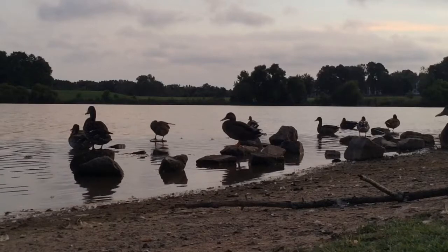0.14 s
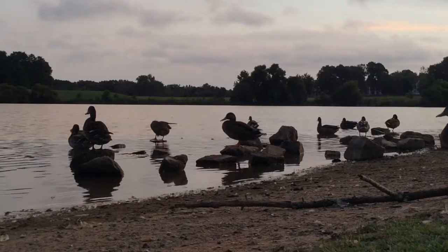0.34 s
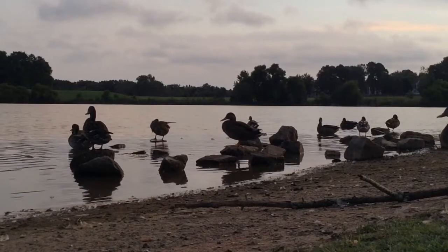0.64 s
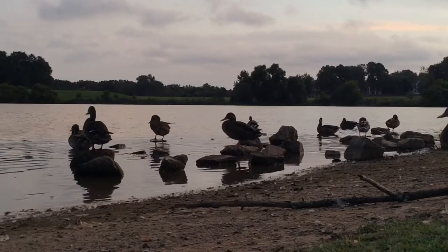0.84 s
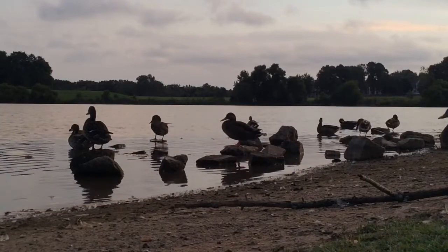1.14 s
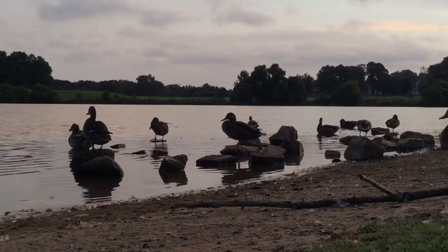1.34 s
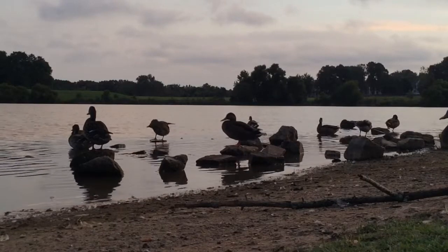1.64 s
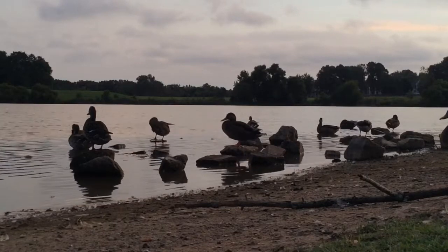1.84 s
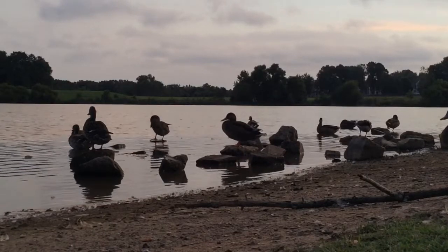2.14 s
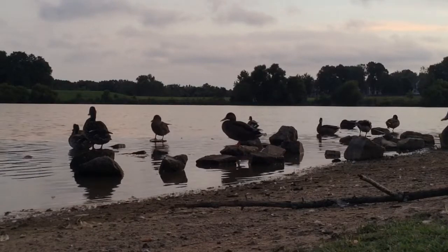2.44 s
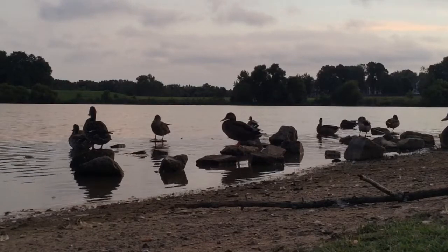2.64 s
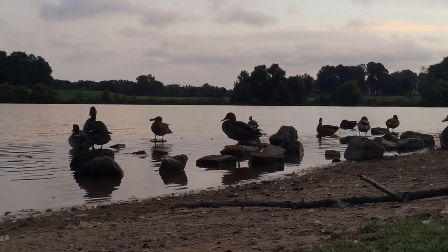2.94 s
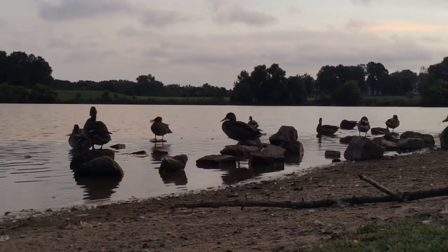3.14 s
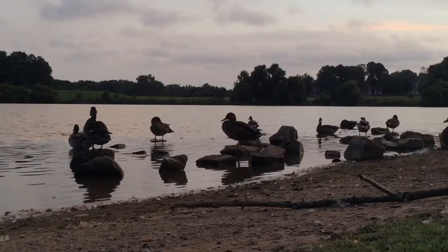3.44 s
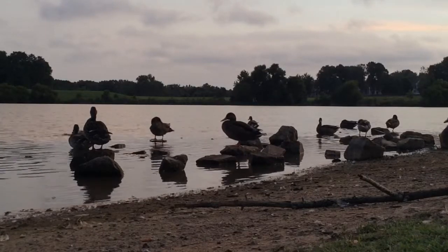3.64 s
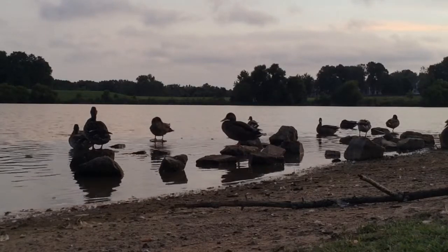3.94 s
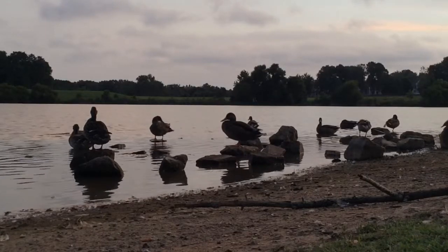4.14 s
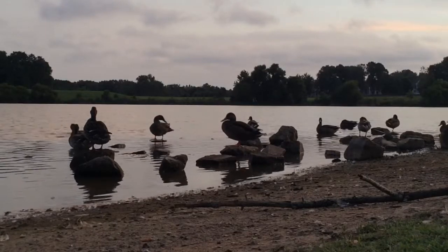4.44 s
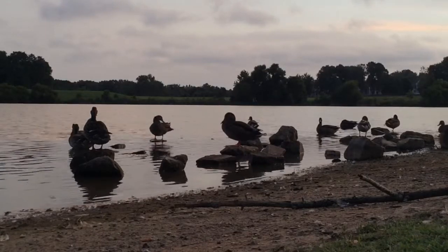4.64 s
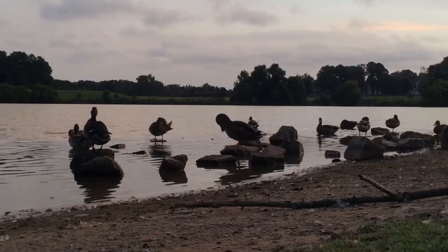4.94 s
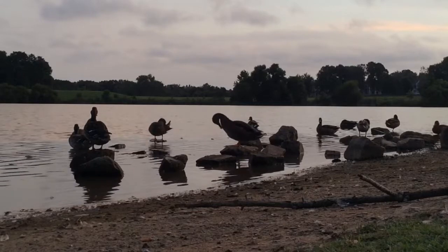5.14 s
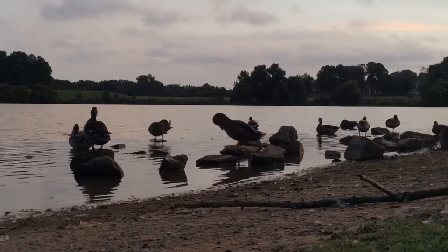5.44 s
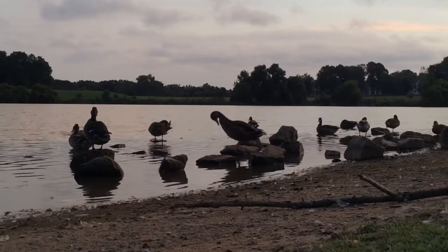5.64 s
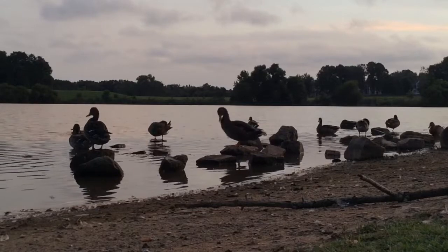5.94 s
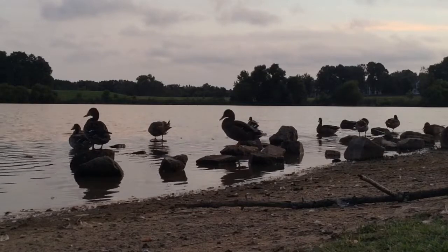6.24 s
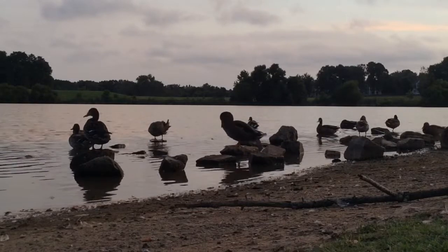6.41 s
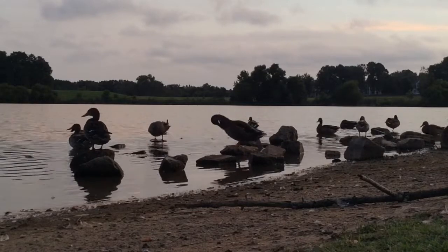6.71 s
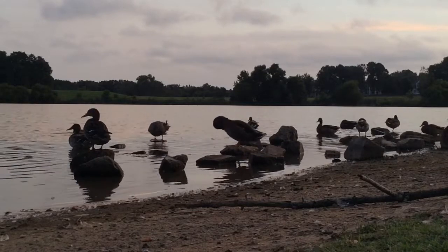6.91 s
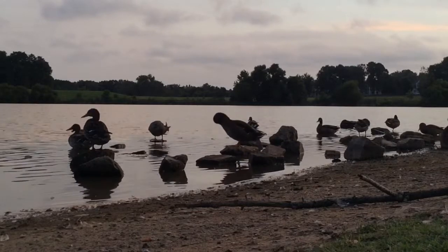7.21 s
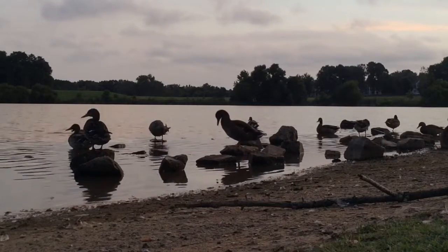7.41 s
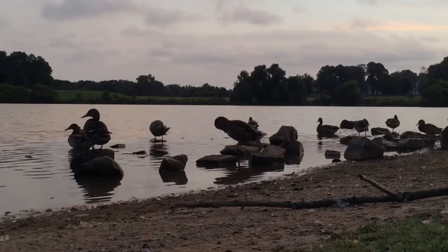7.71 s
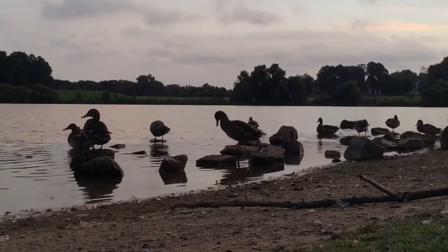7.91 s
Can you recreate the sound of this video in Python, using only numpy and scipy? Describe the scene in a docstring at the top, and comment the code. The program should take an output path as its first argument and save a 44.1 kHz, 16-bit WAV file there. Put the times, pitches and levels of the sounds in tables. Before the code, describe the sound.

A goose honks hoarsely about once a second at a lakeshore, over high insect buzzing and a low rumble of far traffic.

```python
"""A goose honks on a lakeshore: two membranes in its throat oscillate at a low and a high pitch,
alone or together, and their nonlinear coupling breeds sum and difference tones.
A duck quacks once, a pulse train filtered by its bill, and the far shore faintly answers both birds.
Katydids buzz and tick by scraping their wings, and water drips ring as trapped bubbles.
Far traffic rumbles underneath, and a hiss swells late."""
import sys
import numpy as np
from scipy import signal
from scipy.fft import rfft, irfft, next_fast_len
from scipy.io import wavfile
from scipy.ndimage import uniform_filter1d, map_coordinates

SR = 44100
rng = np.random.default_rng(int(sys.argv[2]) if len(sys.argv) > 2 else 0)


def inscribe(sig):
    """Save sig as 16-bit PCM at rate SR to the path in sys.argv[1].

    A 1-D sig is mono; a 2-D sig holds one channel per row.
    Samples are clipped to [-1, 1] before scaling.
    """
    pcm = np.round(np.clip(np.atleast_2d(sig).T, -1, 1) * 32767)
    wavfile.write(sys.argv[1], SR, pcm.astype(np.int16))


N = 355887
T = np.arange(N) / SR


def amp(db):
    """Decibels as an amplitude ratio."""
    return 10 ** (np.asarray(db) / 20)


def unit(x):
    """Normalisation to an rms of 1."""
    return x / np.sqrt(np.mean(x ** 2) + 1e-20)


def strength_of(partials_db):
    """Power addition: the joint amplitude of several partials."""
    return np.sqrt(sum(amp(db) ** 2 for db in partials_db))


def along(points, hz):
    """Interpolation of (frequency_hz, value) points on a log-frequency axis."""
    knots_hz, values = np.transpose(points)
    return np.interp(np.log(hz + 1), np.log(knots_hz + 1), values)


def curves(rows):
    """Linear interpolation in time: one curve for each column after time_s."""
    time_s, *columns = np.transpose(rows)
    return [np.interp(T, time_s, column) for column in columns]


def wobble(rate):
    """Smooth random modulation of rms 1, with rate knots a second."""
    return unit(map_coordinates(rng.standard_normal(int(N * rate / SR) + 4), [T * rate]))


def coloured(x, points):
    """Zero-phase filtering by (frequency_hz, gain_db) points."""
    size = next_fast_len(N + SR // 4)
    return irfft(rfft(x, size) * amp(along(points, np.fft.rfftfreq(size, 1 / SR))), size)[:N]


def noise(points, patchy_db):
    """Filtered noise of rms 1, its gain varying in random patches of time and frequency."""
    spectra = signal.stft(rng.standard_normal(N), nperseg=512)[2]
    patches = uniform_filter1d(rng.standard_normal(spectra.shape), size=5, axis=0)
    patches = unit(uniform_filter1d(patches, size=10, axis=1))
    patchy = signal.istft(spectra * amp(patchy_db * patches), nperseg=512)[1][:N]
    return unit(coloured(patchy, points))


def gate(notes, edge_s):
    """Amplitude gating: 1 while a note sounds, fading to 0 over edge_s outside it."""
    ramps = [np.clip(np.minimum(T - note[0][0], note[-1][0] - T) / edge_s + 1, 0, 1) for note in notes]
    return np.max(ramps, axis=0) ** 2


# spectrum of far traffic: frequency_hz, gain_db
TRAFFIC_SPECTRUM = [(12, -49), (20, -66), (45, -2), (81, 0.5), (109, 0.5), (188, -2.5), (240, -8),
                    (398, -11), (477, -11.5), (528, -11), (1360, -21), (2500, -62.5), (3250, -68),
                    (5500, -120)]
def traffic(level_db=-37.5):
    """Low-frequency noise under slight random amplitude modulation makes a rumble."""
    return amp(level_db + 1.1 * wobble(8)) * noise(TRAFFIC_SPECTRUM, patchy_db=1.5)


# course of the two hiss bands: time_s, lower_db, upper_db
HISS_LEVELS = [(0, -51.5, -55), (.55, -50.5, -56), (1, -53, -61), (1.5, -57.5, -57), (2.4, -58.5, -59.5),
               (3.5, -56.5, -55), (4.1, -58.5, -57), (5.16, -56.5, -53.5), (5.19, -39.5, -39.5),
               (5.5, -39, -39.5), (6, -39.5, -42.5), (6.55, -39.5, -43), (6.88, -44, -47.5),
               (6.95, -48, -51), (7.5, -52, -51.5), (8.07, -60, -51)]
# their spectra: frequency_hz, gain_db
LOWER_BAND = [(400, 0), (1200, 9.5), (1700, 3.5), (2500, 1.5), (3300, -4), (4200, -14)]
UPPER_BAND = [(3000, -20), (4200, -2.5), (6500, 3.5), (9000, 4), (11000, 4), (14000, -1.5)]
def hiss():
    """Two incoherent noise bands add in power and swell late; the lower one flutters."""
    lower_db, upper_db = curves(HISS_LEVELS)
    lower = amp(lower_db + 1.5 * wobble(60)) * noise(LOWER_BAND, patchy_db=1.2)
    return lower + amp(upper_db) * noise(UPPER_BAND, patchy_db=1)


# reverberation time of the far shore: frequency_hz, t60_s
SHORE_DECAY = [(300, 0.22), (1400, 0.78), (3000, .4), (10000, 0.12)]
def shore(x, delay_s=0.038):
    """Reverberation: sound returns late from the trees, each frequency decaying at its own rate."""
    hz, t, spectra = signal.stft(rng.standard_normal(SR), SR, nperseg=256)
    tail = signal.istft(spectra * amp(-60 * t / along(SHORE_DECAY, hz)[:, None]), SR, nperseg=256)[1]
    delayed = np.pad(x, (round(delay_s * SR), 0))
    return signal.fftconvolve(delayed, tail / np.linalg.norm(tail))[:N]


# bubbles trapped by drops: start_s, gain_db, pitch_hz
BUBBLES = [(6.799, -38, 2050), (6.839, -18, 663), (6.847, -26, 2070), (7.023, -29, 1950)]
def drips(rise_s=0.001, t60_s=0.018):
    """Bubble resonance: each drop traps air that rings briefly, rising in pitch."""
    out, t = np.zeros(N + SR), np.arange(SR // 20) / SR
    for start_s, gain_db, pitch_hz in BUBBLES:
        envelope = amp(gain_db - 60 * t / t60_s) * (1 - np.exp(-t / rise_s))
        out[round(start_s * SR):][:len(t)] += envelope * np.sin(2 * np.pi * pitch_hz * t * (1 + 4 * t))
    return out[:N]


# near phrases, before their fades: start_s, end_s, first_db, last_db
BUZZ_PHRASES = [(-.3, 0.553, -43, -44), (.57, .9, -44, -52), (.92, 1.38, -49, -46),
                (1.333, 2.403, -37, -45), (2.788, 4.05, -39, -40), (4.698, 5.5, -34, -46),
                (6.05, 7.436, -41.5, -41.5)]
# the farther insects: time_s, level_db
FAR_CHORUS = [(0, -42), (2.5, -51), (4.1, -52.5), (4.5, -47), (5.3, -50), (5.6, -64), (6.2, -55),
              (7.5, -48), (8.07, -47.5)]
# spectrum of a buzzing wing: frequency_hz, gain_db
WING_SPECTRUM = [(7000, -73), (8400, -13), (9100, -13.5), (11600, -1.5), (12600, 0.5), (13300, 2),
                 (14600, -5.5), (15500, -7.5)]
def katydid_buzz(stroke_hz=41.4, swell_s=0.43, cut_s=0.026):
    """Stridulation: a scraped wing file gives pulsing noise, in phrases that swell and are cut short."""
    power = amp(curves(FAR_CHORUS)[0]) ** 2
    for start_s, end_s, first_db, last_db in BUZZ_PHRASES:
        fade = np.clip(np.minimum((T - start_s) / swell_s, (end_s - T) / cut_s), 0, 1)
        power += (fade * amp(np.interp(T, [start_s, end_s], [first_db, last_db]))) ** 2
    stroke_phase = 2 * np.pi * stroke_hz * T + 0.3 * wobble(3)
    strokes = np.exp(0.85 * np.cos(stroke_phase)) * amp(1.5 * wobble(30))
    pulsing = unit(strokes * noise(WING_SPECTRUM, patchy_db=1))
    return np.sqrt(power) * unit(pulsing + 0.9 * noise(WING_SPECTRUM, patchy_db=1))


# single wing strokes: start_s, relative_db
WING_STROKES = [(1.0363, -31), (1.1029, -29), (1.177, -28.5), (1.3252, -33), (2.5631, -34), (2.6293, -32.5),
                (2.6948, -36.5), (2.7187, -37), (2.7801, -30), (2.8534, -29.5), (2.9013, -36),
                (2.9287, -29), (3.02, -30), (4.3945, -30.5), (4.4568, -26.5), (4.5344, -27),
                (4.6087, -26.5), (4.688, -28.5), (4.7676, -36), (5.7025, -31), (5.7892, -33), (5.9289, -31),
                (5.9978, -28), (6.07, -27.5), (6.1456, -29), (7.859, -31.5), (7.9503, -27.5), (8.0197, -29)]
# spectrum of one stroke: frequency_hz, gain_db
STROKE_SPECTRUM = [(7000, -43), (8500, -11.5), (10000, -7.5), (12000, 2), (13500, 8), (15500, -2)]
def katydid_ticks(gain_db=-6.5, length_s=0.023, rise_s=0.0016, fall_s=0.016):
    """Transient stridulation: a single wing stroke is one short burst of noise."""
    envelope = np.zeros(N)
    for start_s, relative_db in WING_STROKES:
        rise = np.clip((T - start_s) / rise_s, 0, 1)
        fall = np.clip((start_s + length_s - T) / fall_s, 0, 1)
        envelope += amp(gain_db + relative_db) * rise * fall
    return envelope * noise(STROKE_SPECTRUM, patchy_db=2)


# resonances of the duck's bill: frequency_hz, gain_db
BILL_RESPONSE = [(250, -23), (340, -4), (700, -7), (1200, -5.5), (1800, -1), (2150, 1.5), (2700, -15.5),
                 (3400, -27.5), (4300, -26), (6500, -16.5), (9000, -19.5), (12000, -36)]
def duck(start_s=2.998, length_s=0.374, settled_hz=354.2, slack_hz=167.4, tighten_s=0.09):
    """Period doubling: every other pulse is weaker, most of all while the throat is slack."""
    t = np.clip(T - start_s, 0, length_s)
    slack = np.exp(-t / tighten_s)
    pitch_hz = settled_hz - slack_hz * slack
    uneven = np.clip(0.25 + 1.8 * slack, 0, 1)
    cycles = np.cumsum(pitch_hz * (1 + (0.008 + 0.04 * uneven) * wobble(200))) / SR
    count = np.floor(cycles)
    pulses = np.diff(count, prepend=0) * (1 + uneven * (-1) ** count) * amp(0.77 * rng.standard_normal(N))
    quadrature = signal.hilbert(unit(pulses), next_fast_len(N))[:N].imag
    soft_pulses = coloured(quadrature, [(3000, 0), (4500, -14)])
    rasp = unit(np.exp(-2.5 * (cycles % 1)) * rng.standard_normal(N))  # one puff a cycle
    call = unit(coloured(soft_pulses + 0.65 * rasp, BILL_RESPONSE))
    treble = coloured(call, [(3000, -60), (4000, 0)])  # heard only as the throat tightens
    level_db = -19.5 - 19 * np.exp(-t / 0.1) - 42 * np.maximum(t - 0.27, 0)  # swells, then droops
    onset = np.clip(t / 0.025, 0, 1)
    sounding = gate([[[start_s], [start_s + length_s]]], edge_s=0.0051)
    return amp(level_db) * sounding * onset * (call - slack * treble)


# air rasping mostly where the goose's voice breaks upward: peak_s, level_db, rise_s, fall_s (per 20 dB)
AIR_BURSTS = [(1.21, -50.5, 0.49, 0.055), (1.25, -33, 0.023, 0.04), (2.12, -42, 0.1, 0.048),
              (2.331, -37, .012, .035), (3.468, -48, .008, 0.072), (4.26, -50, 0.056, .04),
              (4.455, -44.5, .008, 0.069)]
# spectrum of that air: frequency_hz, gain_db
AIR_SPECTRUM = [(1500, -27), (2500, -31), (3500, 5), (4300, 6), (5300, 6), (6500, -1), (7600, -27),
                (10000, -31), (15000, -34)]
def goose_breath():
    """Flow noise: air rasps past the membranes in bursts that grow and decay exponentially."""
    envelope = sum(amp(level_db - 20 * np.maximum((peak_s - T) / rise_s, (T - peak_s) / fall_s))
                   for peak_s, level_db, rise_s, fall_s in AIR_BURSTS)
    return envelope * noise(AIR_SPECTRUM, patchy_db=2)


# the low membrane, one list a note: time_s, pitch_hz, source_db, neck_ratio (to resting length)
LOW_NOTES = [
    [(1.043, 382.4, -28.5, 1.16), (1.095, 423, -23, 1.18), (1.112, 415.7, -34, 1.14),
     (1.16, 430, -27.5, 1.27), (1.21, 443.3, -26, 1.22), (1.225, 471, -19, 1.06), (1.243, 476, -16.5, 1.12),
     (1.258, 462, -33, 0.7)],
    [(2.04, 442, -50.5, 1.05), (2.13, 459.3, -34, 1.03), (2.18, 463.4, -38.5, 1.02),
     (2.23, 481.5, -36, 1.05), (2.27, 504, -33, 0.98), (2.315, 507, -36.5, 1.015),
     (2.335, 510, -35.5, 0.98)],
    [(3.085, 429.7, -44.5, 1.03), (3.17, 435, -42.5, 1.1), (3.2, 439, -32, 1.01), (3.26, 456.7, -28, 1.03),
     (3.33, 473, -29, 1.03), (3.375, 504, -28.5, 0.98), (3.42, 507, -27, 1.02), (3.455, 520.4, -27.5, 1.08),
     (3.475, 488, -31, 1.12)],
    [(4.145, 492, -30, 1.25), (4.16, 480, -35, 1.03), (4.19, 436.8, -38, 1.07), (4.27, 456, -28.5, 1.05),
     (4.345, 473.4, -27.5, 1.035), (4.38, 513.7, -21, 0.97), (4.43, 517.6, -25, 1.02),
     (4.505, 477.3, -42, 1.12)],
    [(5.13, 503, -42, 1.05), (5.147, 497, -21.5, 1.096), (5.18, 458, -36, 1.15), (5.207, 439, -38, 1.3)],
    [(5.312, 437.4, -31.5, 1.04), (5.325, 436, -25, 1.06), (5.385, 485, -25, 1.022),
     (5.43, 471.5, -22.5, 1.02), (5.46, 477, -20.5, 0.98), (5.49, 500.5, -22.5, 0.99),
     (5.515, 515, -29, 0.99), (5.532, 507, -49, 0.88)],
    [(6.195, 487.4, -29.5, 1.04), (6.24, 448.6, -35.5, 1.21), (6.26, 439, -47.5, 1.05)],
    [(6.335, 482, -34, 1.07), (6.355, 466, -21.5, .98), (6.38, 479.7, -22.5, 1), (6.42, 505.6, -19.5, 0.97),
     (6.47, 503, -20.5, 0.97), (6.51, 516.5, -20.5, 0.95), (6.54, 529.5, -23.5, 0.95),
     (6.56, 526, -32, 0.94), (6.573, 518, -48, 0.96)],
    [(7.208, 441, -31.5, 1.51), (7.22, 437.2, -25, 1.29), (7.25, 420, -41, 1.18), (7.27, 422, -38, 1.17),
     (7.31, 400, -31.5, 1.14), (7.35, 407.2, -23, 1.09), (7.41, 427, -20.5, 1.105),
     (7.45, 438.5, -23, 1.12), (7.525, 452, -24, 1.105), (7.55, 473.6, -19, 1.04), (7.59, 475, -21.5, 1.03),
     (7.632, 454, -42.5, 1.08)],
]
# resonances of the windpipe at resting length: frequency_hz, gain_db
WINDPIPE_RESPONSE = [(350, -2.5), (550, 1.3), (800, 10), (900, -8), (1000, 9), (1090, -3), (1300, 8.5),
                     (1450, 4), (1520, -16.5), (1600, -18)]
# upper overtones against the low note's strength: time_s, relative_db
LOW_OVERTONES = [(1.05, -44), (1.15, -52), (1.24, -52), (2.13, -31), (2.18, -29), (2.27, -26), (2.315, -38),
                 (3.2, -27), (3.33, -33), (3.42, -30), (4.2, -30), (4.27, -35.5), (4.36, -31), (4.43, -40),
                 (5.16, -40), (5.33, -35), (5.43, -33), (5.46, -23.5), (5.5, -37), (6.22, -29),
                 (6.36, -32.5), (6.51, -29.5), (6.55, -30), (7.22, -43), (7.34, -29), (7.41, -38.5),
                 (7.55, -37), (7.6, -40)]
def low_controls():
    """Tube resonance weights the low note's three partials; a longer neck lowers the resonances."""
    pitch_hz, source_db, neck_ratio = curves(np.vstack(LOW_NOTES))
    partials_db = [source_db + along(WINDPIPE_RESPONSE, k * pitch_hz * neck_ratio) for k in (1, 2, 3)]
    upper_db = 20 * np.log10(strength_of(partials_db)) + curves(LOW_OVERTONES)[0]
    return pitch_hz, partials_db, upper_db, gate(LOW_NOTES, edge_s=0.0075)


def short_note(start_s, length_s, first_hz, last_hz, first_db, last_db, *timbre):
    """Breakpoint envelope: attack, glide, then a release that sags in pitch."""
    attack_s, release_s, edge_db, sag = 0.01145, 0.01513, -10, 0.04
    return [(start_s, first_hz, first_db + edge_db, *timbre),
            (start_s + attack_s, first_hz, first_db, *timbre),
            (start_s + length_s - release_s, last_hz, last_db, *timbre),
            (start_s + length_s, last_hz * (1 - sag), last_db + edge_db, *timbre)]


# the high membrane's short notes:
# start_s, length_s, first_hz, last_hz, first_db, last_db, octave_db, overtones_db
HIGH_NOTES = [(0.792, 0.035, 640, 690, -39.5, -44, 4.5, -27), (0.886, 0.095, 678, 692, -47, -42.5, 5, -25),
              (1.045, 0.0449, 590, 611.4, -27, -37, -5, -33),
              (1.952, 0.039, 656, 681, -36, -45, 7.5, -24.5), (2.013, .11, 615, 629, -38.5, -42, 0.5, -26),
              (2.327, 0.099, 657, 653.6, -30, -36, 6.5, -17.5),
              (3.073, .09, 640, 637.7, -28, -54, 2.5, -36),
              (3.455, 0.091, 667, 646.4, -26.5, -29.5, 4, -18.5),
              (4.108, 0.048, 655, 701, -23.5, -27, 2, -26), (4.172, .11, 635, 642.3, -24.5, -34.5, -7, -36),
              (4.437, 0.079, 675, 645, -25.5, -29.5, 6, -28), (5.11, .04, 708.4, 702, -21.5, -23, 2, -31),
              (5.15, 0.057, 695, 630, -23.5, -22.5, -2, -33.5),
              (5.311, 0.0279, 645, 653.4, -36.5, -33.5, 12, -20),
              (5.36, 0.071, 592.5, 597.6, -32, -33, -6, -23),
              (5.507, 0.0336, 658.7, 644, -30.5, -30, 7.5, -38),
              (6.173, 0.048, 646.7, 685, -15, -25.5, 1.5, -43),
              (6.218, 0.041, 617, 614, -18, -23.5, -3, -46),
              (6.325, 0.059, 676, 685, -19, -29.5, -3.2, -43), (6.413, 0.16, 698, 712.5, -35, -22, -1, -30),
              (7.196, 0.0706, 618.8, 575, -18.5, -42, 4.5, -38),
              (7.268, 0.064, 573.6, 586.4, -28, -46.5, -1, -38), (7.608, 0.034, 601, 579, -27, -34, 3, -38),
              (7.704, 0.033, 656, 641, -40, -36, -5, -25)]
# its one long note, breaking into a full honk: time_s, pitch_hz, level_db, octave_db, overtones_db
FULL_HONK = [(1.097, 559, -18, -6, -32), (1.108, 556, -25, -4, -37), (1.16, 572, -26.5, 3, -42),
             (1.21, 594.4, -28.5, 7.5, -34), (1.228, 625.9, -33, 0, -42), (1.24, 664.3, -11.5, -3.5, -40),
             (1.256, 666, -9.5, 1.5, -17), (1.275, 681.1, -9, 0.5, -20), (1.305, 691.7, -9.5, -10.5, -23),
             (1.33, 682.9, -11, -12, -21.5), (1.345, 664, -14.5, 1.5, -22), (1.358, 630, -29, 3, -31),
             (1.375, 600, -37, -6, -30)]
def high_controls():
    """Harmonic balance: the high note's octave and overtones are set relative to its fundamental."""
    notes = sorted([short_note(*row) for row in HIGH_NOTES] + [FULL_HONK])
    pitch_hz, level_db, octave_db, overtones_db = curves(sorted(sum(notes, [])))
    return pitch_hz, [level_db, level_db + octave_db], level_db + overtones_db, gate(notes, edge_s=0.005)


def membrane(pitch_hz, partials_db, upper_db, sounding, beak, tilt_db, hoarse):
    """Periodic vibration gives a harmonic series, its top coloured by the beak. Returns phase, sound."""
    pitch_hz = uniform_filter1d(pitch_hz, size=400)  # muscle tension changes smoothly
    phase = 2 * np.pi * np.cumsum(pitch_hz * (1 + 0.04055 * hoarse * wobble(150))) / SR
    body = sum(amp(db) * np.sin(k * phase) for k, db in enumerate(partials_db, 1))
    on = sounding > 0
    overtones = np.zeros(N)
    jittered = phase + 0.1 * wobble(120)  # early and late cycles smear the overtones
    for k in range(len(partials_db) + 1, 24):
        hz = k * pitch_hz[on]
        drift_db = 3.5 * wobble(40)[on]  # the beak moves, so each overtone swells on its own
        level_db = upper_db[on] + along(beak, hz) + tilt_db[on] * np.log2(hz / 3000) + drift_db
        overtones[on] += amp(level_db) * np.sin(k * jittered[on] + rng.uniform(0, 2 * np.pi))
    return phase, np.sqrt(2) * sounding * (body + overtones)


# combination tones: low_multiple, high_multiple
TONE_ORDERS = [(1, 1), (-1, 2), (3, -1), (4, -1), (2, 1), (3, 1), (1, 2), (5, -2)]
# their weights, in the same order: gain_db
TONE_GAINS = [0, -4, -5, -9, -10, -10, -14, -11]
def combination_tones(low_phase, high_phase):
    """Nonlinear coupling breeds sums and differences of multiples of the two pitches."""
    return sum(amp(db) * np.sin(m * low_phase + n * high_phase + m * n)
               for (m, n), db in zip(TONE_ORDERS, TONE_GAINS))


# how beak and throat are held: time_s, tilt_db_per_octave, coupling_db, harshness_ratio
POSTURE = [(1.07, 1.5, -9, 0.31), (1.17, -4, -4.5, 0.16), (1.25, 1.5, -7, 0.31), (2.25, 6, -7, 0.38),
           (3.3, -11, -5, 0.52), (4.3, -6.5, -2, 0.44), (5.16, -6, 1.5, .6), (5.42, 0, -11.5, 0.22),
           (6.22, -1.5, -2, 0.58), (6.45, -11, -1, 0.13), (7.4, -5.5, -7.5, .75)]
# the beak's response to each membrane's overtones: frequency_hz, gain_db
BEAK_FOR_LOW = [(1500, 13), (2000, -2.5), (2800, -5.5), (3800, -9), (5000, -10), (6100, -7.5), (7600, -40),
                (9500, -21), (12000, -30)]
BEAK_FOR_HIGH = [(1500, 5), (2000, -2), (2750, -16), (3400, -5.5), (4100, 2.5), (4800, -12), (6100, -8.5),
                 (7600, -30), (9500, -7.5), (11500, -22), (13500, -14), (15500, -23)]
# what the windpipe passes of the bred and hoarse parts: frequency_hz, gain_db
THROAT_RESPONSE = [(200, -31), (380, -3.5), (710, -5), (850, -21), (980, 2), (1480, -2), (1750, -10.5),
                   (3000, -26), (16000, -48)]
def goose(lone_hoarseness=0.032):
    """Coupled oscillators: two membranes share an airstream; the nearer in strength, the hoarser."""
    tilt_db, coupling_db, harshness = curves(POSTURE)
    low_hz, low_db, low_upper_db, low_on = low_controls()
    high_hz, high_db, high_upper_db, high_on = high_controls()
    low_strength, high_strength = low_on * strength_of(low_db), high_on * strength_of(high_db)
    balance = np.minimum(low_strength, high_strength) / (np.maximum(low_strength, high_strength) + 1e-9)
    rivalry = np.abs(uniform_filter1d(balance, size=700))
    hoarse = np.clip(lone_hoarseness + harshness * np.sqrt(rivalry), 0, 0.9)
    low_phase, low = membrane(low_hz, low_db, low_upper_db, low_on, BEAK_FOR_LOW, tilt_db, hoarse)
    high_phase, high = membrane(high_hz, high_db, high_upper_db, high_on, BEAK_FOR_HIGH, tilt_db, hoarse)
    coupling = amp(coupling_db) * np.sqrt(2 * low_strength * high_strength)
    voice = low + high + coloured(coupling * combination_tones(low_phase, high_phase), THROAT_RESPONSE)
    shimmer = 1.4 * hoarse * np.tanh(wobble(400))  # hoarseness shakes every cycle's size
    return voice * np.sqrt(1 - hoarse ** 2) + coloured(voice * shimmer, THROAT_RESPONSE)


def scene():
    """Superposition of all sources in one channel; only the birds reverberate."""
    birds = goose() + goose_breath() + duck()
    echo = amp(-32.0) * shore(birds)
    return (birds + echo + katydid_buzz() + katydid_ticks() + drips() + traffic() + hiss())[None]


def record(dry, top_hz=15660):
    """Soft saturation rounds peaks near full scale, then a steep low-pass limits the band."""
    limited = dry / (1 + np.abs(dry) ** 8) ** (1 / 8)
    return coloured(limited[0], [(top_hz - 20, 0), (top_hz + 20, -120)])[None]


dry = scene()
out = record(dry)
inscribe(out)
```